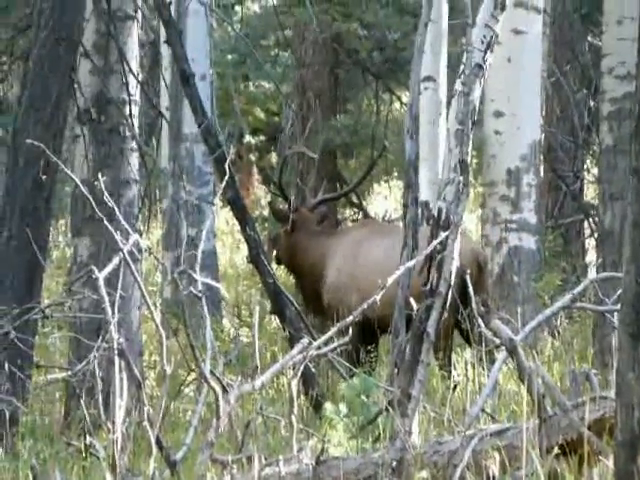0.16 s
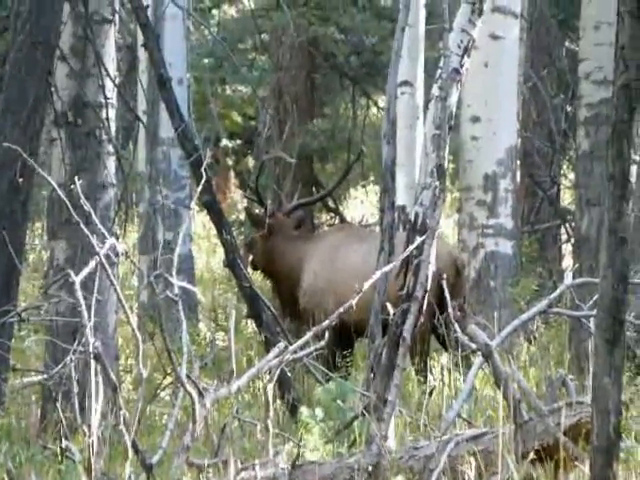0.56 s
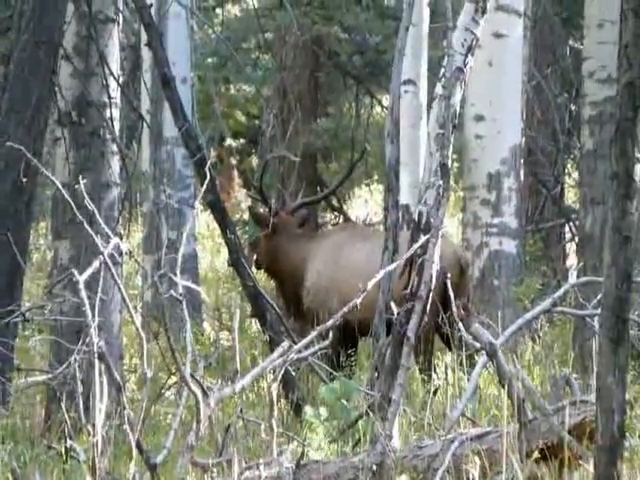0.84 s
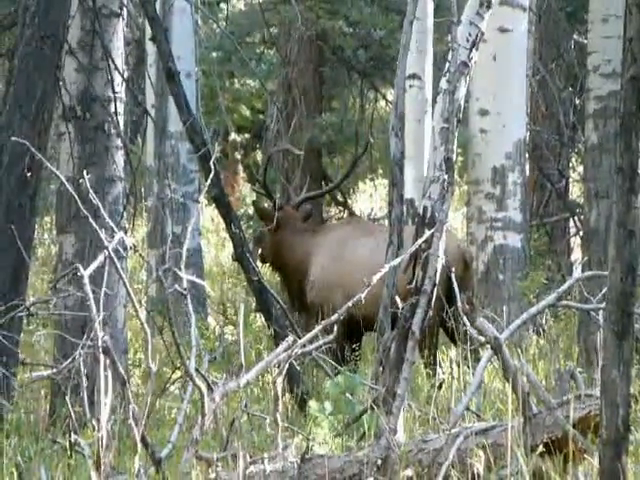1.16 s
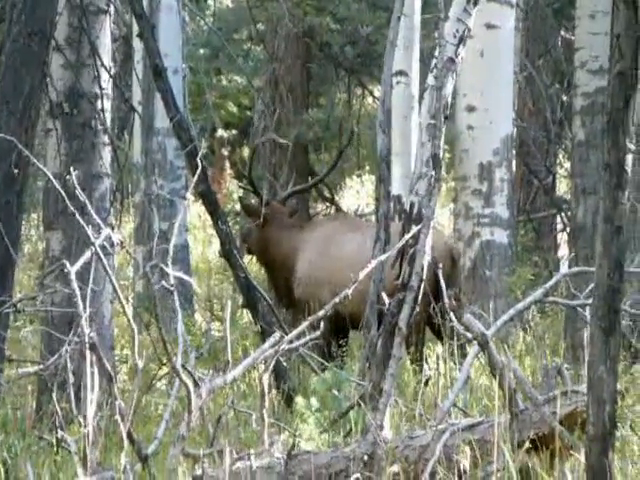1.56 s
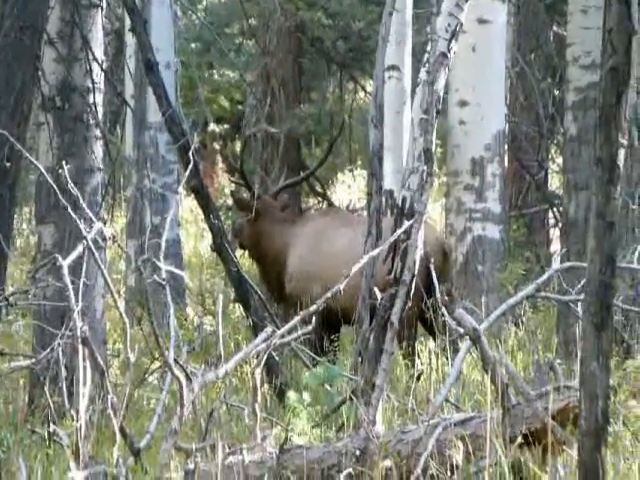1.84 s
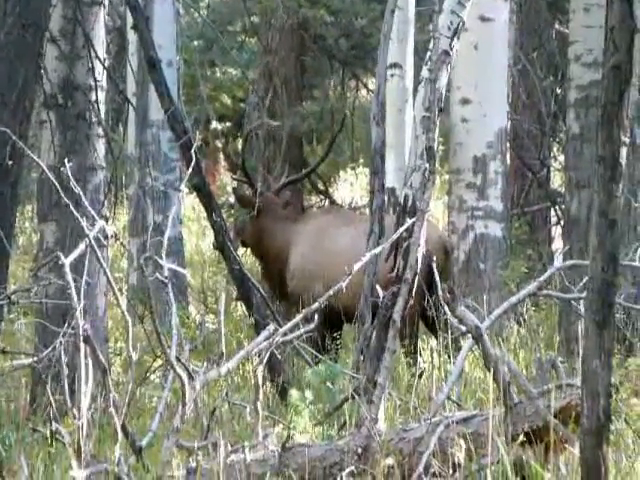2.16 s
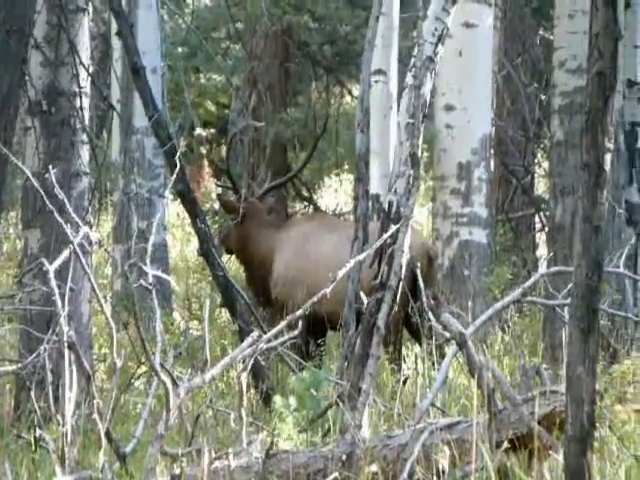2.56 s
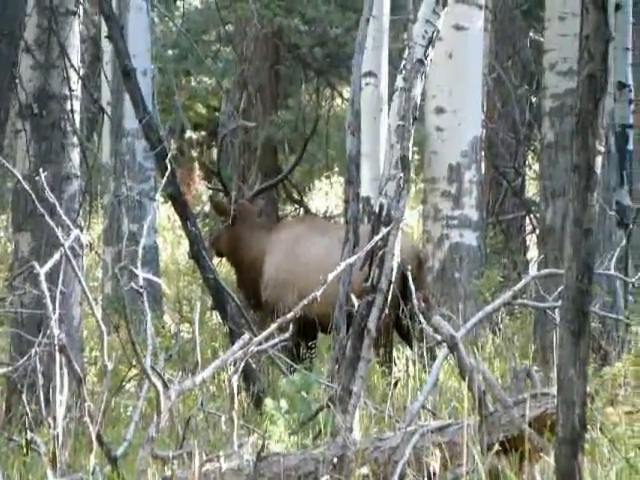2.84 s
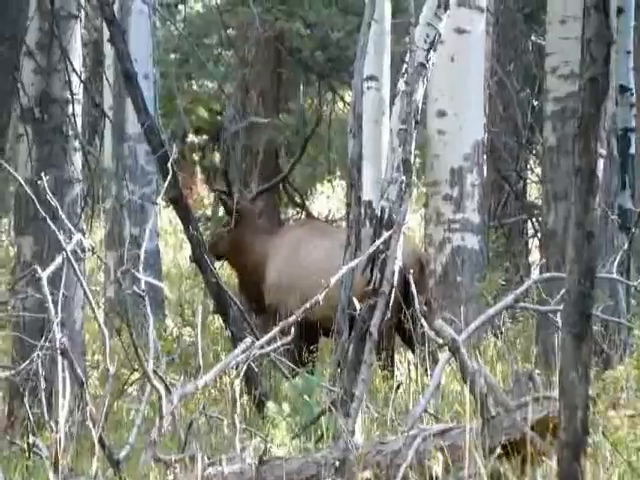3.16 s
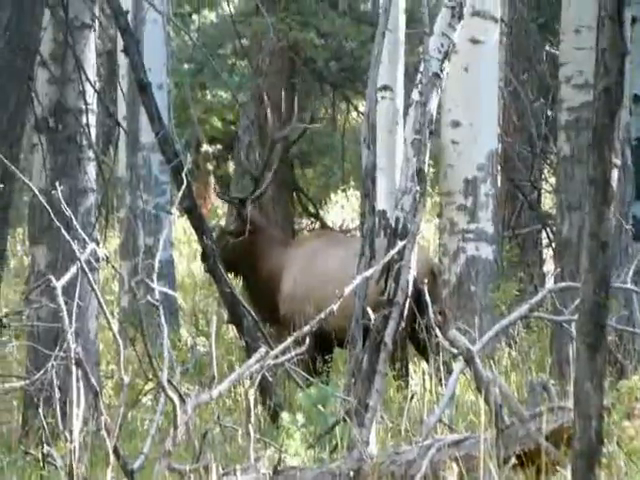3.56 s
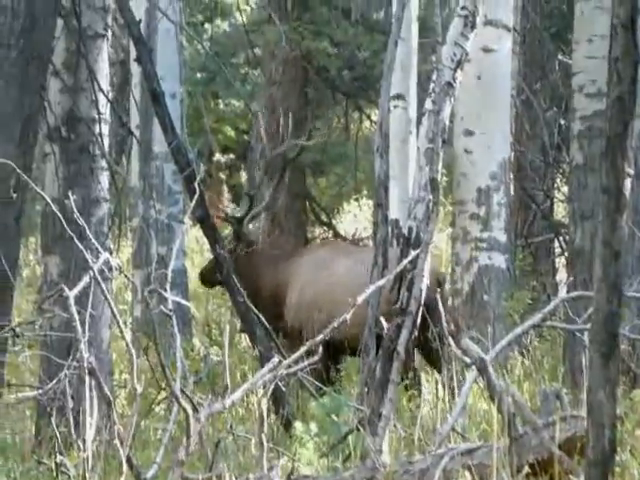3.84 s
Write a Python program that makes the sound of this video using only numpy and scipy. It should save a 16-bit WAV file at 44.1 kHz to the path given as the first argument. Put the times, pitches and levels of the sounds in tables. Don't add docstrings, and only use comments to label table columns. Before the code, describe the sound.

A bull elk's high, breathy bugle wavers between pitches, tumbles into a short hoarse roar and echoes among trees; then hooves thud in litter, a twig crunches and a bird honks twice, over soft hiss.

```python
import sys
import numpy as np
from scipy import signal
from scipy.fft import rfft, irfft, next_fast_len
from scipy.io import wavfile
from scipy.ndimage import map_coordinates

SR = 44100
rng = np.random.default_rng(int(sys.argv[2]) if len(sys.argv) > 2 else 0)


def volts_from_db(level):
    exponent = np.asarray(level, float) / 20
    return 10 ** exponent


def dump(signal):
    limited = np.clip(np.atleast_2d(signal).T, -1, 1)
    pcm = np.round(limited * 32767).astype(np.int16)
    wavfile.write(sys.argv[1], SR, pcm)


N = 176400
LEAD_S = 0.8
M = N + round(LEAD_S * SR)
T = np.arange(M) / SR - LEAD_S
EDGE_S = 0.018


def unit(x):
    return x / np.sqrt(np.mean(x ** 2) + 1e-20)


def along(points, hz):
    f, v = np.transpose(points)
    return np.interp(np.log(hz + 1), np.log(f + 1), v)


def curves(rows):
    s, *cols = np.transpose(rows)
    return [np.interp(T, s, c) for c in cols]


def wobble(rate):
    coarse = np.arange(0, M + 64, 64)
    knots = rng.standard_normal(600)
    return np.interp(np.arange(M), coarse, map_coordinates(knots, [coarse * rate / SR]))


def gate(s, length, edge):
    nearest_end = np.minimum(T - s, s + length - T)
    return np.sin(np.pi / 2 * np.clip(nearest_end / edge, 0, 1)) ** 2


def filtered(x, response):
    m = next_fast_len(M + SR // 2)
    return irfft(rfft(x, m) * response(np.fft.rfftfreq(m, 1 / SR)), m)[..., :M]


def resonate(x, peaks):
    def response(f):
        total = 0
        for center, width, db in peaks:
            damping = 1.5j * f * width
            total = total + volts_from_db(db) * (damping / (center ** 2 - f ** 2 + damping)) ** 2
        return total
    return filtered(x, response)


def tone(hz, overtones_db, lift_db=0):
    jitter_hz, shimmer_db, overtone_fade_db = 3, 1.5, 2.5
    phase = 2 * np.pi * np.cumsum(hz + jitter_hz * wobble(40.01)) / SR
    upper = sum(volts_from_db(db) * np.sin((k + 2) * phase) for k, db in enumerate(overtones_db[1:]))
    upper = upper * volts_from_db(lift_db + overtone_fade_db * wobble(7.6))
    return volts_from_db(3 + shimmer_db * wobble(30.58)) * (volts_from_db(overtones_db[0]) * np.sin(phase) + upper)


# [t/s, f/Hz]
WHISTLE_PITCH = [(-.3, 1767), (-.05, 1830), (0.0, 1850), (.12, 1915), (.3, 2000), (.355, 2068), (.7, 2074),
                 (0.774, 2084), (1.0, 2075), (1.261, 2068)]
# [t/s, level/dB]
WHISTLE_LEVEL = [(0.0, -43), (.12, -44.5), (0.24, -32), (.32, -29.5), (.37, -26), (.46, -37.5),
                 (.51, -23.5), (.57, -22), (.635, -39.5), (.68, -24), (.725, -34.5), (.76, -33),
                 (.82, -28.5), (.87, -22.5), (0.915, -41), (.975, -37.5), (1.02, -27.5), (1.06, -26),
                 (1.1, -35), (1.135, -26.5), (1.21, -25.5), (1.255, -33.5)]
# [t/s, level/dB]
SECOND_PARTIAL = [(.3, -61), (.36, -47), (.46, -56), (.53, -41.5), (.57, -57), (.65, -40), (.69, -50.5),
                  (.73, -41), (.79, -48.5), (.85, -39), (.9, -56.5), (.94, -44.5), (1.02, -40.5),
                  (1.08, -62), (1.13, -50), (1.17, -43), (1.22, -53), (1.26, -40)]
FLIP_PARTIALS = [-0.5, -18.5, -34.5]
GLIDE_DULL_DB, THIRD_DB = -6.5, -19
ROUGH_HZ = 5.5


def whistle():
    pitch, level_db = curves(WHISTLE_PITCH)[0], curves(WHISTLE_LEVEL)[0]
    first = tone(pitch, [0]) * volts_from_db(level_db)
    glide_db = level_db + FLIP_PARTIALS[1] + GLIDE_DULL_DB
    upper_db = np.where(T < SECOND_PARTIAL[0][0], glide_db, curves(SECOND_PARTIAL)[0])
    third = tone(3 * pitch, [THIRD_DB]) * gate(SECOND_PARTIAL[1][0], 1, EDGE_S)
    upper = volts_from_db(upper_db) * (tone(2 * pitch, [0]) + third)
    return (first + upper) * gate(-1, 2.262, EDGE_S)


# [t/s, length/s, f/Hz, level/dB, overtone
# lift/dB]
MODE_FLIPS = [(-.4, 0.5, 1767, -47.5, 5), (-.3, 0.39, 1547, -47.5, -26), (-0.1, 0.18, 2232, -43, -23.5),
              (0.257, 0.054, 2203, -35, -24.5), (0.366, 0.13, 2180, -41.5, -23.5),
              (.3, 0.19, 1996, -41, -23), (0.727, 0.032, 2190, -37, 8.5), (0.765, 0.135, 2183, -30.5, -1),
              (0.768, 0.063, 2120, -25.5, -18), (0.843, 0.064, 2120, -29, -17.5),
              (0.9, 0.12, 2121, -33, -21.5), (0.88, .17, 2162, -38.5, -2), (1.064, 0.13, 2200, -37.5, 3),
              (1.204, 0.19, 2188, -38, -4.5), (1.257, 0.14, 2070, -27.5, -21.5),
              (1.373, 0.071, 2060, -40, -21), (0.066, 0.64, 1061, -56.5, -27.5),
              (0.709, 0.21, 3380, -61.5, -33), (1.302, 0.052, 3366, -51, -34),
              (0.094, 0.099, 2447, -45, -30), (0.2, 0.19, 2457, -41.5, -28),
              (0.409, 0.068, 2420, -33, -30.5), (0.506, 0.35, 2426, -45.5, -22.5),
              (1.08, .32, 667.6, -52.5, -30), (1.216, .05, 2380, -37.5, -29),
              (1.282, 0.082, 1555, -37.5, -33.5), (1.268, 0.07, 1720, -35, 1.5)]


def flips():
    out = np.zeros(M)
    for s, length, hz, db, lift_db in MODE_FLIPS:
        out += tone(hz + ROUGH_HZ * wobble(60), FLIP_PARTIALS, lift_db) * volts_from_db(db) * gate(s, length, EDGE_S)
    return out


# [t/s, f/Hz, level/dB, overtone lift/dB]
WHISTLE_FALL = [
    (1.338, 1640, -46, -12),
    (1.355, 1570, -33, -18),
    (1.367, 1545, -38, -22),
    (1.377, 1515, -26, -22),
    (1.385, 1350, -44, -22),
    (1.391, 1160, -38, -22),
    (1.4, 1095, -30, -22),
    (1.412, 1000, -42, -22),
    (1.42, 700, -46, -22),
    (1.432, 300, -42, -22),
]
FALL_PARTIALS = [0, -19, -45]


def fall():
    hz, db, lift_db = curves(WHISTLE_FALL)
    start, end = WHISTLE_FALL[0][0], WHISTLE_FALL[-1][0]
    falling = tone(hz + 2 * ROUGH_HZ * wobble(90), FALL_PARTIALS, lift_db)
    return falling * volts_from_db(db) * gate(start, end - start, EDGE_S / 2)


# [f/Hz, width/Hz, level/dB]
WINDPIPE = [(345, 140, -29.5), (762, 157, -21), (1100, 39, -12), (1550, 300, -19.5), (1965, 14, -14.5),
            (2206, 73, -2), (2439, 35, -0.5), (2660, 53, -17), (2899, 38, -14.5), (3390, 120, -29),
            (4406, 74, -24), (4840, 220, -31)]
# [f/Hz, width/Hz, level/dB]
LOW_WINDPIPE = [(1538, 48, -4.5), (1760, 69, -3), (1830, 99, -1), (3560, 90, -8), (3792, 35, -6.5)]
# [t/s, level/dB]
AIRFLOW = [(-.8, -43.5), (-.1, -51.5), (-0.41, -47), (0.71, -43.5), (-0.34, -45.5), (.8, -45.5),
           (1.1, -44.5), (1.42, -43), (1.45, -73)]
LOW_AIR_DB, LOW_AIR_FADE_DB_PER_S, AIR_GUST_DB = -47, 32, 2.2


def breath():
    gusts = rng.standard_normal(M) * volts_from_db(AIR_GUST_DB * wobble(14))
    air = unit(resonate(gusts, WINDPIPE)) * volts_from_db(curves(AIRFLOW)[0])
    low_db = LOW_AIR_DB - LOW_AIR_FADE_DB_PER_S * np.abs(T)
    low_air = unit(resonate(rng.standard_normal(M), LOW_WINDPIPE)) * volts_from_db(low_db)
    return (air + low_air) * (T < AIRFLOW[-1][0])


# [f/Hz, width/Hz, level/dB]
ROAR_THROAT = [(190, 50, -9), (294, 80, -3), (668, 60, 2), (788, 70, 4), (1075, 120, 0), (1250, 60, -6),
               (1545, 130, -4), (1785, 50, -3), (3300, 200, -19)]
# [t/s, pulse rate f/Hz, level/dB]
ROAR_COURSE = [
    (1.05, 170, -79),
    (1.11, 168, -51),
    (1.3, 154, -52),
    (1.449, 147, -43),
    (1.546, 130, -49.5),
    (1.619, 105, -50.5),
    (1.747, 174, -66.5),
]
ROAR_NOISE = 0.7
CHEST_DB, CHEST_S, CHEST_LENGTH_S = -59, 1.1, 0.33


def roar():
    rate, db = curves(ROAR_COURSE)
    cycle = np.cumsum(rate * (1 + 0.0601 * wobble(60))) / SR
    pulses = np.diff(np.floor(cycle), prepend=0) * volts_from_db(0.44 * wobble(98))
    gated = rng.standard_normal(M) * (0.24 + np.cos(np.pi * cycle) ** 2)
    voice = (1 - ROAR_NOISE) * unit(pulses) + ROAR_NOISE * unit(gated)
    chest = volts_from_db(CHEST_DB + 1.4 * wobble(18.0)) * np.sin(2 * np.pi * cycle)
    chest = chest * gate(CHEST_S, CHEST_LENGTH_S, 2 * EDGE_S)
    start, end = ROAR_COURSE[0][0], ROAR_COURSE[-1][0]
    hoarse = unit(resonate(voice, ROAR_THROAT)) * volts_from_db(db + 2.6 * wobble(11))
    return chest + hoarse * gate(start, end - start, EDGE_S)


# [f/Hz, T60/s]
FOREST_T60 = [(150, 3.3), (700, 3.09), (2100, 1.64), (4200, 0.75), (8000, 0.42)]
# [f/Hz, level/dB]
FOREST_LEVEL = [(150, -10), (300, -2.5), (2100, -3.5), (4200, -1), (8000, -3)]
# [f/Hz, likeness 0-1]
FOREST_ALIKE = [(200, 1), (600, 1), (2000, 0.26), (4000, 0.13)]
ECHO_RISE_S = 0.012


def forest(x):
    hz, t, z = signal.stft(rng.standard_normal((2, 2 * SR)), SR, nperseg=256)
    t60 = along(FOREST_T60, hz)[:, None]
    decay = volts_from_db(along(FOREST_LEVEL, hz)[:, None] - 60 * t / t60)
    z = z * decay * (1 - np.exp(-t / ECHO_RISE_S)) / np.sqrt(t60)
    scale = 2.7 / np.linalg.norm(signal.istft(z[0], SR, nperseg=256)[1])
    angle = np.arccos(np.clip(along(FOREST_ALIKE, hz), 0, 1))[:, None] / 2
    mid, side = np.cos(angle) * z[0], np.sin(angle) * z[1]
    tail = signal.istft(np.array([mid + side, mid - side]), SR, nperseg=256)[1]
    return signal.fftconvolve(x[None], scale * tail, axes=1)[:, :M]


# [t/s, length/s, f/Hz, level/dB]
SLOPE_RETURNS = [
    (1.419, 0.21, 2200, -39.5),
    (1.55, 0.14, 2068, -36),
    (1.686, 0.16, 2190, -49),
    (1.875, .12, 2195, -51),
    (2.02, 0.19, 2067, -52.5),
    (2.2, 0.13, 2193, -58.5),
    (1.478, 0.09, 1795, -41),
    (1.5, .26, 4140, -69),
    (2.2, .37, 2064, -62),
]


def slope():
    sides = []
    for side in range(2):
        late = np.zeros(M)
        for s, length, hz, db in SLOPE_RETURNS:
            late += tone(hz + ROUGH_HZ * wobble(30.2), [db]) * gate(s, length, 0.04)
        sides.append(late)
    return np.array(sides)


# [t/s, level/dB]
HOOF_STEPS = [
    (2.752, -45),
    (2.781, -41.5),
    (3.158, -42),
    (3.242, -41),
    (3.275, -39.5),
    (3.335, -65),
    (3.594, -49),
    (3.639, -42.5),
    (3.768, -41),
    (3.822, -43),
]
# [f/Hz, width/Hz, level/dB]
LITTER = [(424, 560, -2.7), (995, 310, 0.69)]
THUD_S, THUD_DB = 0.02, -9
RUSTLE_RATE, RUSTLE_DB, RUSTLE_SPREAD_DB = 400, -63.5, -0.5


def hooves():
    env = sum(volts_from_db(db - 60 * np.abs(T - s) / (3 * THUD_S)) * (T > s) for s, db in HOOF_STEPS)
    thuds = unit(resonate(env * rng.standard_normal(M), LITTER))
    thuds = volts_from_db(THUD_DB) * thuds * np.sqrt(np.mean(env ** 2))
    grains = rng.random(M) < RUSTLE_RATE / SR * volts_from_db(3 * wobble(5))
    sizes = volts_from_db(RUSTLE_SPREAD_DB * np.minimum(rng.exponential(size=M), 2))
    grains = grains * rng.uniform(-1.4, 1, M) * sizes
    rustle = volts_from_db(RUSTLE_DB + 0.53 * wobble(8.5)) * unit(resonate(grains, LITTER))
    return thuds + rustle


# [f/Hz, level/dB]
TWIG_COLOR = [(200, -7), (400, -1.5), (1200, -4), (5200, -7), (7000, -26)]
TWIG_S, TWIG_DB, TWIG_T60 = 2.94, -55, 1.3
SNAP_DB, SNAP_T60 = 2, 0.08


def twig():
    crackle = rng.standard_normal(M) * volts_from_db(1.1 * wobble(70))
    crunch = unit(filtered(crackle, lambda f: volts_from_db(along(TWIG_COLOR, f))))
    since = np.abs(T - TWIG_S)
    env = volts_from_db(-60 * since / TWIG_T60) + volts_from_db(SNAP_DB - 60 * since / SNAP_T60)
    return crunch * volts_from_db(TWIG_DB) * env * (T > TWIG_S)


# [t/s, length/s, top pitch f/Hz, level/dB, brightest f/Hz]
BIRD_NOTES = [
    (3.424, 0.108, 524, -51, 2850),
    (3.916, 0.112, 523, -48.5, 3250),
]
# [f/Hz, width/Hz, level/dB]
FAR_VOICE = [(2350, 150, 0), (2050, 100, -4)]
FAR_CALL_S, FAR_CALL_DB = 3.72, -62
BIRD_DIP, BIRD_PEAK_AT, BIRD_BEND = 0.16, 0.36, 2.6
BIRD_WIDTH_HZ, BIRD_LOW_DB, BIRD_TOP_HZ = 870, -10.5, 3900
BIRD_ECHO_S, BIRD_ECHO_T60, BIRD_ECHO_DB = 0.03, 0.35, -1


def bird():
    out = np.zeros(M)
    for s, length, top_hz, db, bright_hz in BIRD_NOTES:
        u = np.clip((T - s) / length, 0, 1)
        rising, falling = 1 - u / BIRD_PEAK_AT, (u - BIRD_PEAK_AT) / (1 - BIRD_PEAK_AT)
        bend = np.where(u < BIRD_PEAK_AT, rising, falling)
        hz = top_hz * (1 - BIRD_DIP * bend ** BIRD_BEND)
        phase = 2 * np.pi * np.cumsum(hz) / SR
        note = np.zeros(M)
        for k in range(2, 10):
            nasal = volts_from_db(-6 * ((k * hz - bright_hz) / BIRD_WIDTH_HZ) ** 2) + volts_from_db(BIRD_LOW_DB) * (k < 5)
            flutter = volts_from_db(1.24 * wobble(44) - 5.3 * (k * top_hz > BIRD_TOP_HZ))
            note += nasal * flutter * np.cos(k * phase)
        out += volts_from_db(db) * note * gate(s, length, 0.036)
    t = np.arange(SR // 2) / SR
    tail = rng.standard_normal((2, len(t))) * volts_from_db(-60 * t / BIRD_ECHO_T60) * (t > BIRD_ECHO_S)
    echo = signal.fftconvolve(out[None], tail / np.linalg.norm(tail[0]), axes=1)[:, :M]
    echo = filtered(echo, lambda f: 1j * f / (2000 + 1j * f))
    far = unit(resonate(rng.standard_normal(M), FAR_VOICE)) * gate(FAR_CALL_S, 1, 0.22)
    return out + volts_from_db(FAR_CALL_DB) * far + volts_from_db(BIRD_ECHO_DB) * echo


# [f/Hz, level/dB]
LEAF_COLOR = [(18, -44), (30, -7), (71, -9.5), (242, 2), (291, -1), (596, 2.5), (935, 3), (1440, -11),
              (4000, -35.5), (5200, -47), (8800, -120)]
# [f/Hz, likeness 0-1]
LEAF_ALIKE = [(25, 0.65), (60, 1), (100, 1), (600, 0.099), (3000, 0.55)]
LEAVES_DB, LEAF_GUST_DB = -57, 1.8


def leaves():
    def spread(hz):
        angle = np.arccos(np.clip(along(LEAF_ALIKE, hz), -1, 1)) / 2
        return volts_from_db(along(LEAF_COLOR, hz)) * [np.cos(angle), np.sin(angle)]
    mid, side = filtered(rng.standard_normal((2, M)), spread)
    return volts_from_db(LEAVES_DB + LEAF_GUST_DB * wobble(4.63)) * unit(np.array([mid + side, mid - side]))


# [f/Hz, level/dB]
HISS_COLOR = [(1180, -20.5), (2000, -3), (2120, -5.5), (4480, -9.5), (4760, -10), (6370, -9.5),
              (15600, -18.5)]
HISS_DB = -59


def hiss():
    noise = filtered(rng.standard_normal((2, M)), lambda hz: volts_from_db(along(HISS_COLOR, hz)))
    return volts_from_db(HISS_DB + 0.13 * wobble(5.3)) * unit(noise)


HUM_HZ, HUM_DB, HUM_WANDER_HZ = 82.3, -70.5, 2.4


def hum():
    phase = 2 * np.pi * np.cumsum(HUM_HZ + HUM_WANDER_HZ * wobble(12.0)) / SR
    return volts_from_db(HUM_DB + 2.5 + 1.8 * wobble(7.8)) * np.sin(phase)


ELK_PAN_DB, ECHO_PAN_DB = 1, 3
WHISTLE_ECHO_DB, ECHO_DB = -11, -5
LEFT_LAG_S, LAG_TOP_HZ = 4 / SR, 3000
TOP_HZ, TOP_SHELF_HZ, TOP_SHELF_DB = 15700, 14500, -11.5


def pan(db):
    return volts_from_db([[db / 2], [-db / 2]])


def scene():
    throat, air = roar(), breath()
    call = whistle() + flips() + fall()
    elk = pan(ELK_PAN_DB) * (call + air) + pan(1.6) * throat
    echo = forest(volts_from_db(WHISTLE_ECHO_DB) * call + volts_from_db(ECHO_DB) * (air + throat))
    late = slope()
    late = 0.62 * late[0] + [[0.5], [-0.5]] * late[1]
    ground = pan(1) * (bird() + hooves() + twig())
    around = pan(ECHO_PAN_DB) * (echo + late) + ground + leaves() + hiss() + hum()
    left = filtered(around[0], lambda hz: np.exp(-2j * np.pi * LEFT_LAG_S * hz * (hz < LAG_TOP_HZ)))
    mix = elk + np.array([left, around[1]])
    top = filtered(mix, lambda hz: (hz < TOP_HZ) * volts_from_db(TOP_SHELF_DB * (hz > TOP_SHELF_HZ)))
    return top[:, M - N:]


def top_cut(x):
    return signal.sosfilt(signal.butter(12, 15700, fs=SR, output="sos"), x)


def record(dry):
    return top_cut(dry)


dry = scene()
out = record(dry)
dump(out)
```